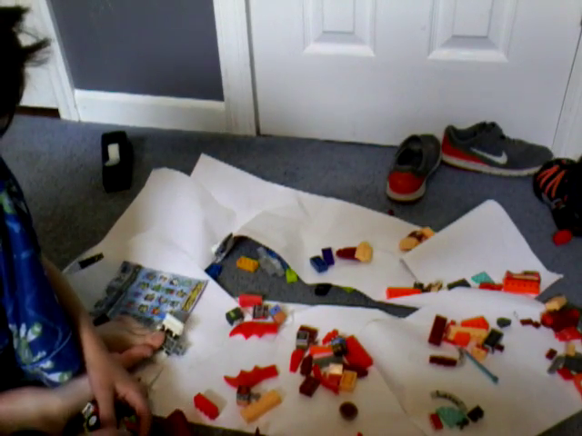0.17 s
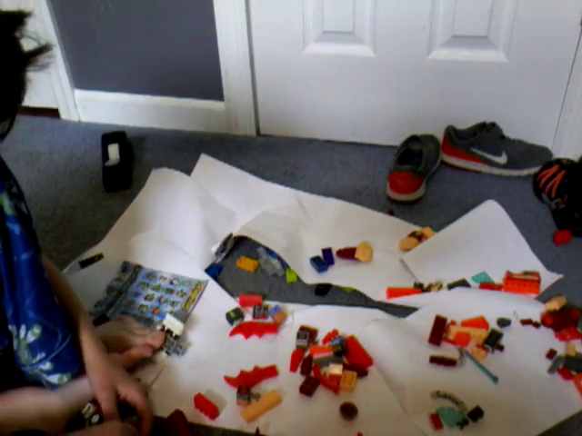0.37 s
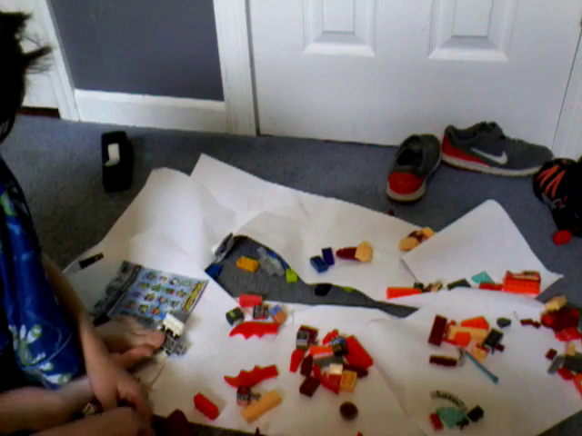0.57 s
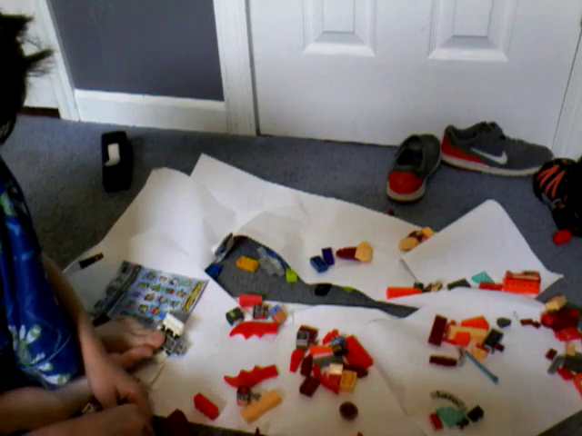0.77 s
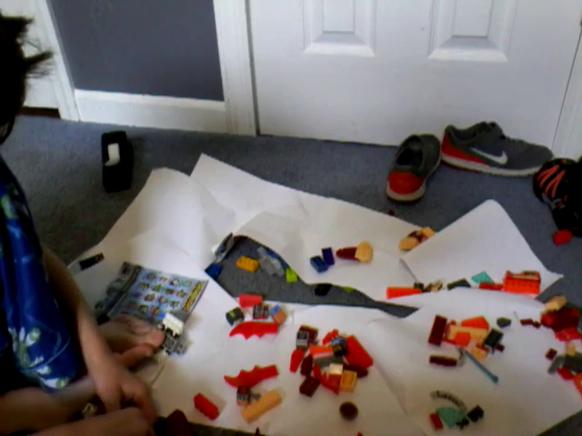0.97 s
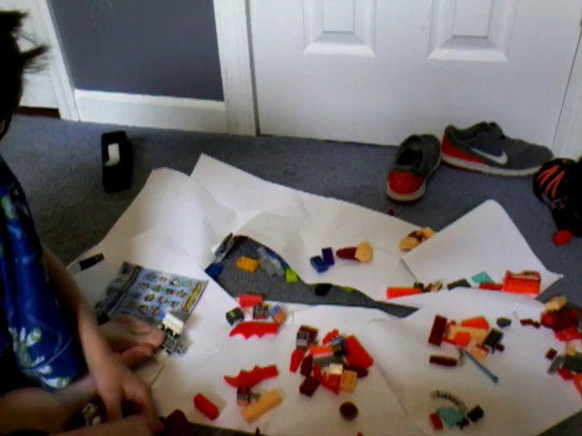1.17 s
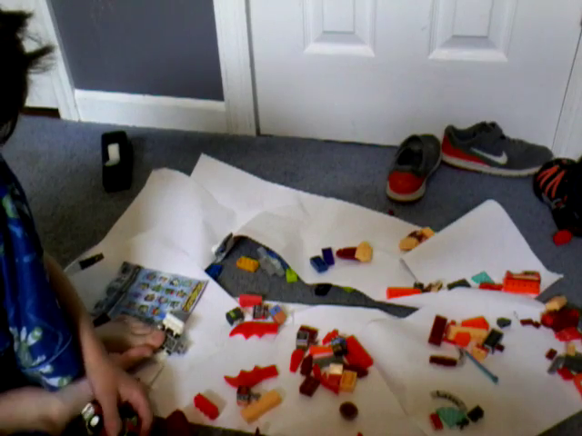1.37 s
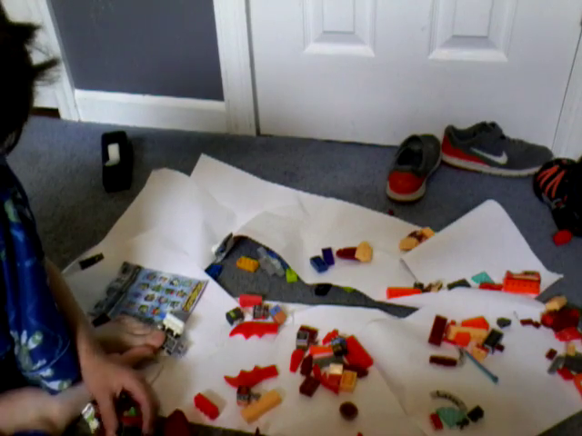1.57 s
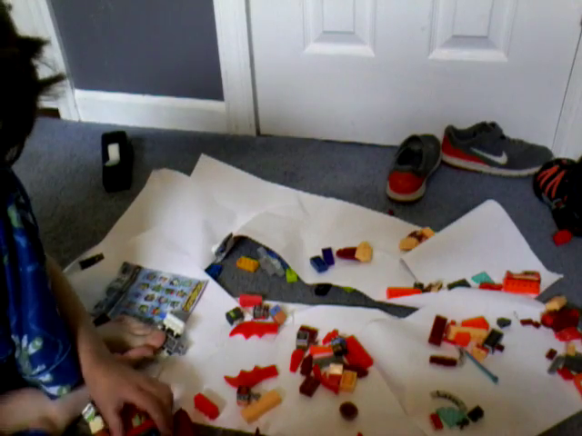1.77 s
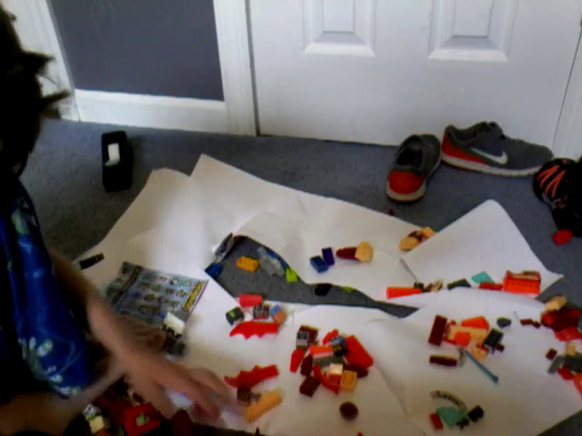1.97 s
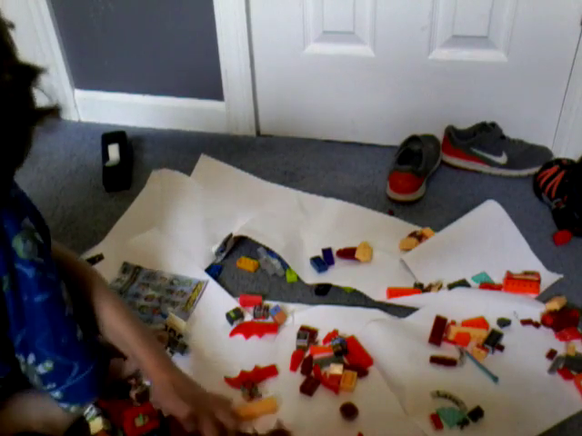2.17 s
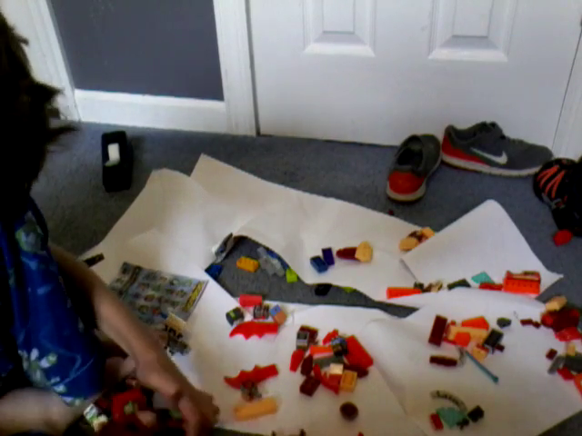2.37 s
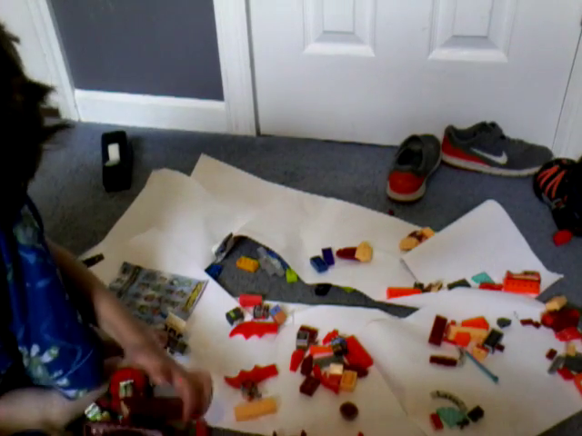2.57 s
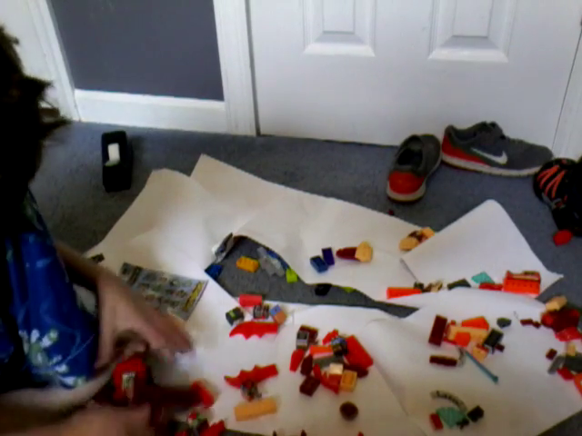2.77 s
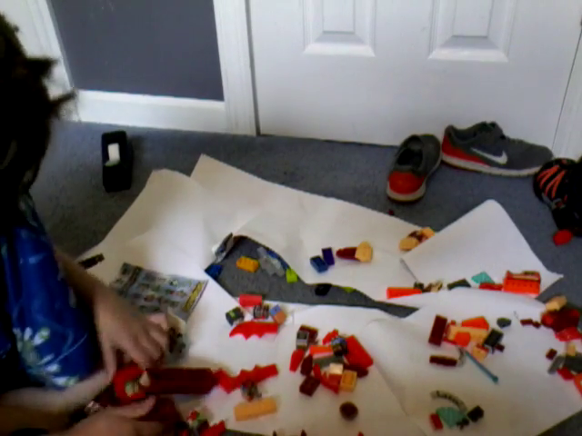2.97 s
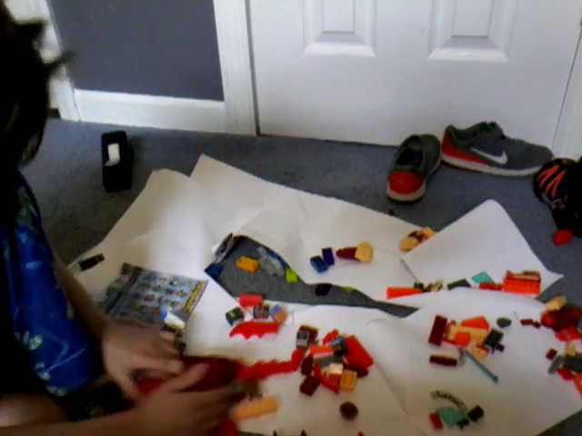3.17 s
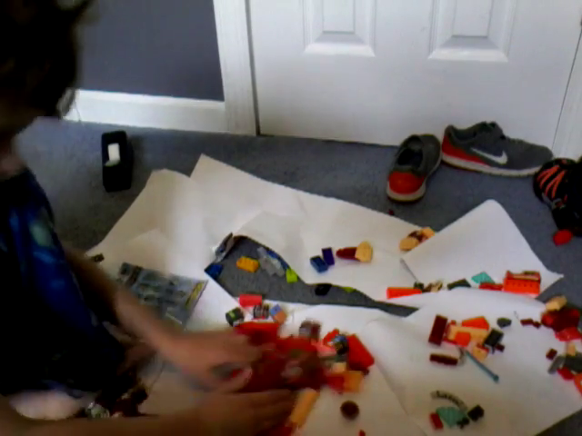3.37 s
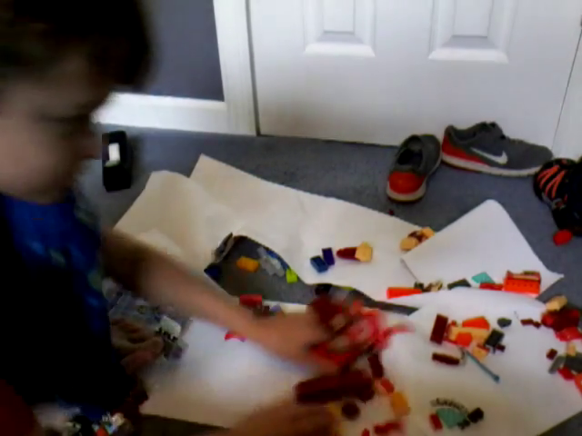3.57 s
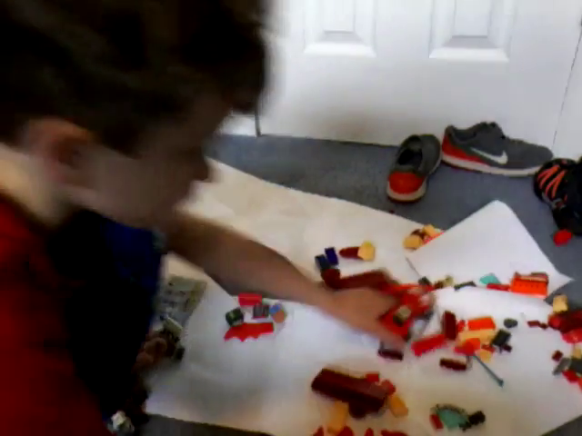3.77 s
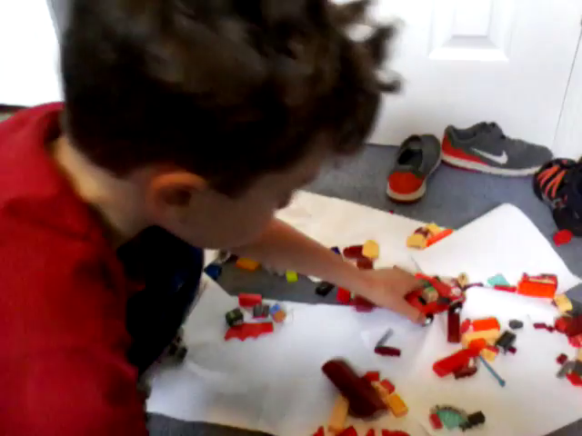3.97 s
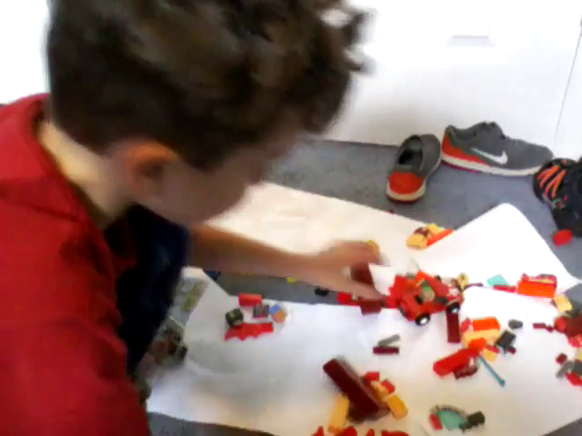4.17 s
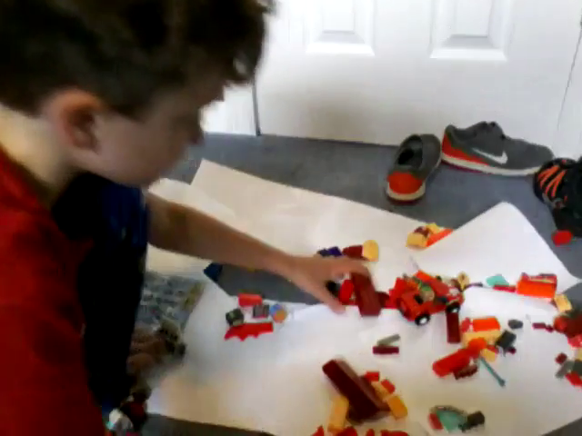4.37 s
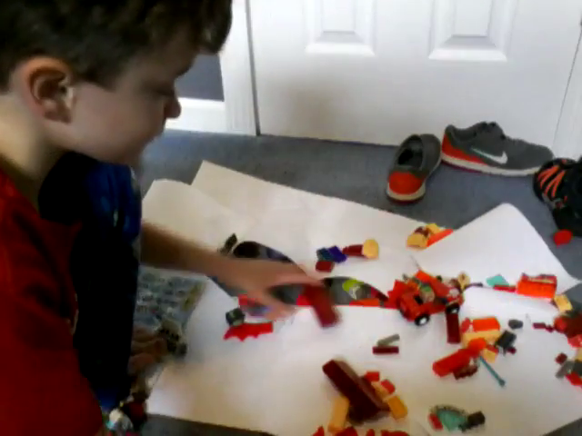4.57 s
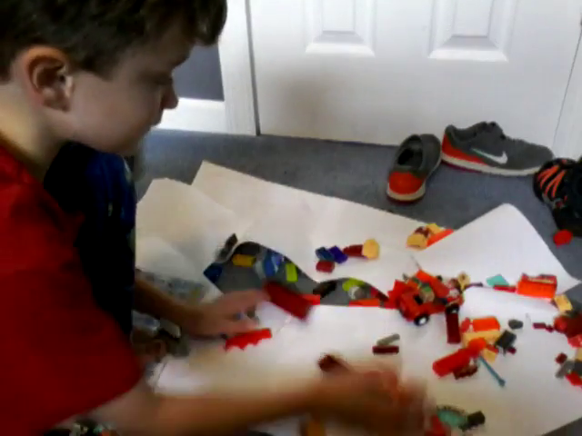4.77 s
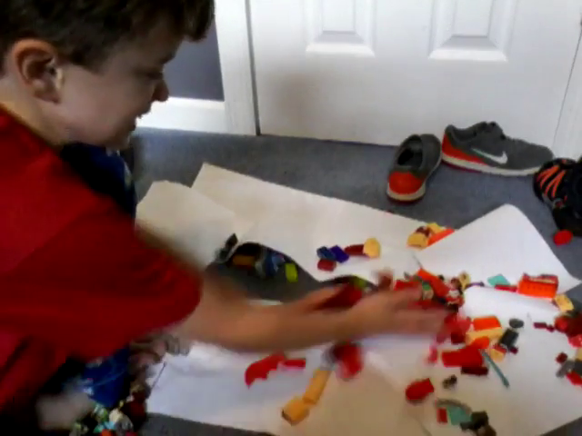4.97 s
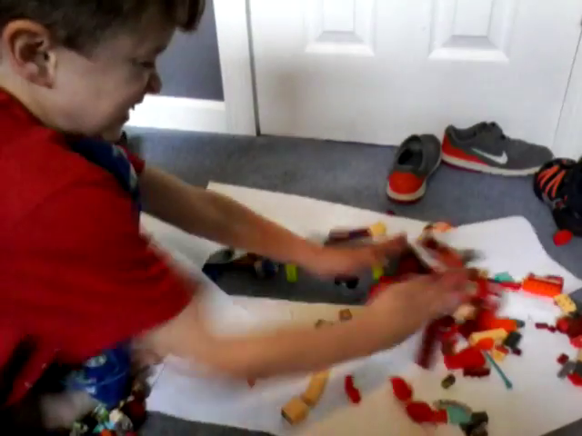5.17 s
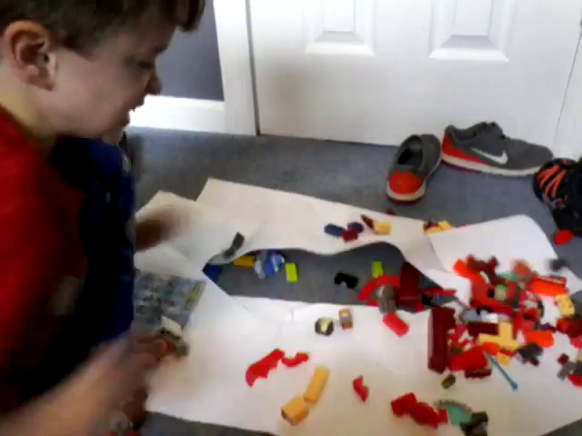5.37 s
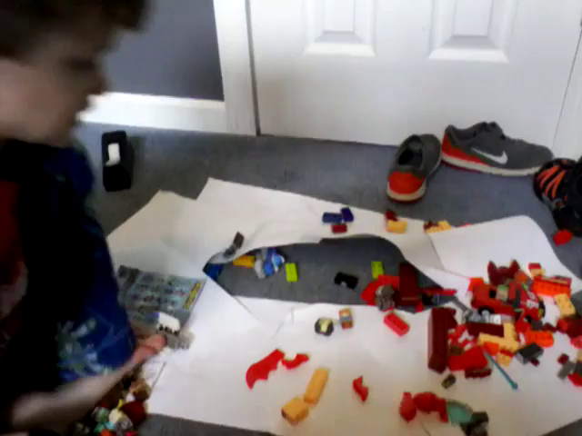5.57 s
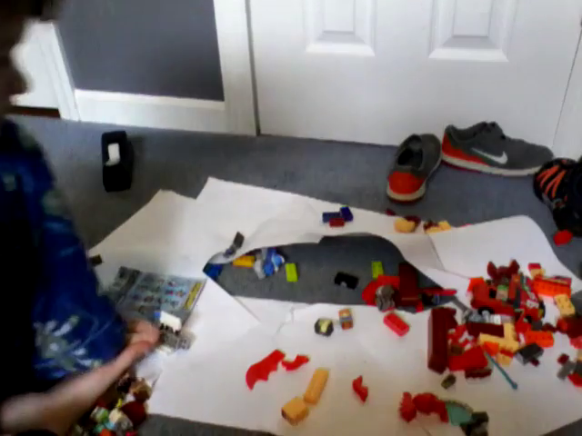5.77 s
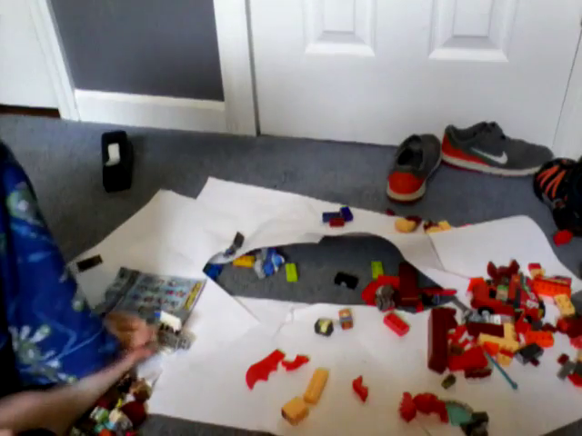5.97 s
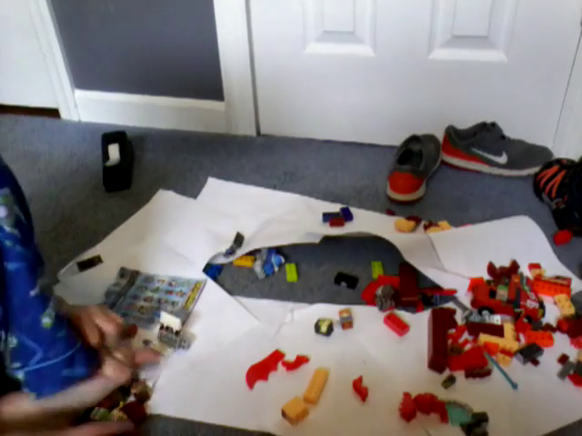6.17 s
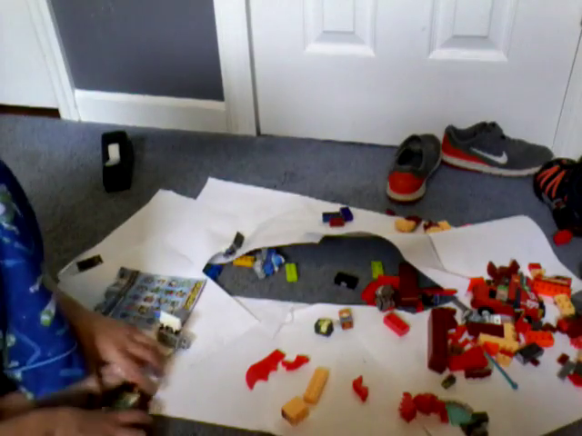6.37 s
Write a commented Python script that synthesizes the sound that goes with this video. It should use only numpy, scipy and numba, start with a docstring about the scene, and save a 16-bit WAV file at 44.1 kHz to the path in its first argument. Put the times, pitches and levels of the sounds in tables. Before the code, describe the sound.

After a quiet hum and one dry snap, a hand rakes small hollow plastic bricks over paper, a dense bright clatter that thins to faint ticks.

```python
"""Small hollow plastic bricks, raked by a hand on paper over a bedroom carpet, close to a small microphone.
Each clear knock is a noise crack plus short decaying brick modes, one ring of its own and a soft thud.
A swarm of lesser knocks fills the sweeps over rustling noise of paper. A hollow and a long piece ring too,
with single notes, dry snaps and ticks. A decaying noise tail is the room; a quiet house hums behind."""
import sys
import numpy as np
from scipy import signal
from scipy.fft import rfft, irfft
from scipy.io import wavfile
from scipy.ndimage import uniform_filter1d, minimum_filter1d
from numba import njit

SR = 44100
rng = np.random.default_rng(int(sys.argv[2]) if len(sys.argv) > 2 else 0)


def to_wav(s):
    """Save 16-bit WAV."""
    ch = np.atleast_2d(s).T  # columns
    pcm = np.round(np.clip(ch, -1, 1) * 32767)  # PCM
    wavfile.write(sys.argv[1], SR, pcm.astype(np.int16))


def invert_db(x):
    """Field ratio 10**(x/20) for x, a level in decibels (scalar or array-like)."""
    u = np.asarray(x, float) / 20
    return 10 ** u


N = 282681

# clear knocks; treble and thud relative to level: start_s, level_db, pitch_hz, t60_s, treble_db, thud_db
KNOCKS = [(1.5033, -35.5, 4440, 0.009, -14, -44), (1.5255, -32, 4530, 0.009, -33, -10),
          (1.6288, -22, 4370, 0.014, -35, -18), (1.6434, -42, 4430, 0.01, -31, -34),
          (1.6562, -32.5, 4440, 0.021, -27, -16), (1.6678, -20, 3440, 0.011, -35, -43),
          (1.6902, -8, 4260, 0.0098, -21, -51), (1.7034, -9.5, 4220, 0.018, -32, -57),
          (1.7104, -7, 4160, 0.012, -33, -57), (1.7163, -18, 4270, 0.013, -23, -53),
          (1.7519, -10, 4460, 0.012, -29, -52), (1.76, -9.5, 4280, 0.045, -19, -32),
          (1.7755, -3.5, 4270, 0.012, -36, -46), (1.7858, -4, 4460, 0.031, -31, -60),
          (1.8021, 1, 3880, 0.026, -34.5, -60), (1.8128, -14, 4120, 0.016, -28, -60),
          (1.8679, -34, 3770, 0.029, -28, -39), (1.9105, -25, 4270, 0.033, -26, -36),
          (1.9226, -26, 4400, 0.016, -22, -33), (2.0252, -22.5, 3780, 0.03, -21.5, -36),
          (2.0397, -27, 3620, 0.01, -26, -40), (2.0578, -2, 3820, 0.01, -33.5, -38.5),
          (2.066, -17, 3470, 0.011, -29.5, -45), (2.079, -21, 3880, 0.0071, -28.5, -45),
          (2.085, -5.5, 4430, 0.01, -33, -43), (2.0911, 5, 4290, 0.014, -33, -56),
          (2.0988, 5.5, 4330, 0.01, -30.5, -38), (2.1002, -9, 3300, 0.02, -14.5, -30),
          (2.1206, 2, 4440, 0.022, -20.5, -35.5), (2.1336, -2, 3650, 0.024, -21, -22),
          (2.157, -2.5, 4290, 0.048, -19.5, -47), (2.1754, -4, 4290, 0.013, -22, -53),
          (2.1832, 1, 4260, 0.023, -27, -50), (2.2016, -0.5, 4360, 0.009, -25, -52.5),
          (2.2094, -3, 3900, 0.034, -30, -43), (2.2364, 8, 4200, 0.014, -31.5, -42),
          (2.259, 13, 3854, 0.021, -29.5, -50), (2.2676, -0.5, 4100, 0.024, -27, -46),
          (2.309, 4, 4700, 0.01, -28.5, -53.5), (2.3343, -1.5, 3970, 0.054, -28.5, -52),
          (2.3556, 4.5, 3750, 0.026, -30, -57), (2.3648, 4, 2980, 0.019, -30.5, -58),
          (2.3803, 2.5, 3930, 0.026, -25.5, -59), (2.4059, 2, 3930, 0.01, -35, -60),
          (2.4117, 3, 4110, 0.031, -26, -60), (2.4336, -8.5, 4760, 0.04, -24.5, -52),
          (2.4517, -12, 4900, 0.043, -32, -55.5), (2.4673, -23, 4230, 0.018, -33, -56),
          (2.4924, -5.5, 3760, 0.029, -29, -22), (2.5077, -5.5, 4240, 0.011, -32, -38),
          (2.529, 7, 4510, 0.01, -26, -54), (2.5466, -2, 4490, 0.025, -29, -54),
          (2.5491, 12, 4200, 0.014, -17, -59), (2.5596, -8, 4160, 0.0071, -22.5, -60),
          (2.5897, -3.5, 4450, 0.012, -26, -49.5), (2.627, -2, 4650, 0.019, -28, -28),
          (2.6364, 1, 5140, 0.02, -35, -50), (2.6442, -5, 3940, 0.056, -34.5, -50),
          (2.674, -11.5, 5080, 0.028, -23.5, -51), (2.6897, 0, 3860, 0.026, -21, -59),
          (2.717, -18, 4600, 0.025, -24.5, -53), (2.745, -15, 4360, 0.017, -15, -45),
          (2.7934, -7, 3310, 0.028, -34, -42), (2.8002, -17, 4200, 0.031, -20, -46),
          (2.826, -13, 4310, 0.025, -19, -21), (2.8385, -15, 4230, 0.025, -27, -47),
          (2.878, -20, 4580, 0.025, -32, -42), (2.8917, -1, 4330, 0.011, -38, -53),
          (2.8963, -3, 3810, 0.028, -22, -52), (2.9174, -8, 4380, 0.024, -32, -45),
          (2.929, -6, 4650, 0.012, -25, -45), (2.9339, -10, 3620, 0.034, -20, -41),
          (2.945, -5, 3420, 0.03, -26, -51), (2.96, -12.5, 4400, 0.018, -21, -45),
          (2.9766, -19, 4460, 0.014, -24, -45), (3.0095, -6, 8130, 0.011, 4, -24),
          (3.0219, -9.5, 4080, 0.014, -20, -43), (3.024, -9, 3960, 0.035, -15, -39),
          (3.042, -4.5, 3220, 0.029, -29.5, -30), (3.053, -9, 4420, 0.018, -27, -46),
          (3.0869, -2, 3010, 0.015, -33, -24.5), (3.098, -13.5, 4190, 0.012, -26, -43),
          (3.1076, -14, 4600, 0.024, -29, -44), (3.118, -10, 2970, 0.024, -35, -47),
          (3.1266, -2.5, 4270, 0.018, -30, -52), (3.1313, -13, 4360, 0.029, -35, -47),
          (3.1496, -14.5, 2890, 0.024, -34, -51), (3.1625, -5, 4280, 0.018, -33, -49),
          (3.172, -9, 4870, 0.012, -28.5, -47), (3.1777, -9.5, 5000, 0.019, -21, -27.5),
          (3.1845, -2.5, 4220, 0.01, -26, -53), (3.1987, -9, 4600, 0.022, -30, -46),
          (3.2106, -6, 4980, 0.012, -26, -23.5), (3.2152, -5.5, 3320, 0.02, -21, -45),
          (3.2317, -12, 4500, 0.014, -25, -37), (3.24, -6.5, 5330, 0.018, -23, -40),
          (3.2669, -2, 3470, 0.017, -16, -14.5), (3.2862, -5.5, 4450, 0.025, -15, -45),
          (3.3002, -5.5, 4540, 0.034, -25, -42.5), (3.321, -11, 4430, 0.028, -31, -46),
          (3.3388, -3, 3960, 0.015, -39, -42), (3.3609, 5, 4440, 0.012, -40, -55.5),
          (3.3724, -6, 4570, 0.024, -37, -48), (3.399, -1.5, 4070, 0.033, -32.5, -50.5),
          (3.4163, -0.5, 4710, 0.038, -18.5, -52), (3.4495, 6, 6160, 0.023, -22.5, -53.5),
          (3.4726, 2, 6800, 0.025, -14.5, -23.5), (3.4863, -4, 4210, 0.037, -19, -42),
          (3.495, 6, 4330, 0.0095, -17.5, -48), (3.529, 7, 4400, 0.0095, -28, -50),
          (3.536, 4.5, 4490, 0.013, -24.5, -49), (3.543, -4, 4320, 0.027, -23, -46),
          (3.5639, 7.5, 4510, 0.014, -13, -46.5), (3.5695, -0.5, 4090, 0.032, -14, -43),
          (3.5854, -1.5, 3970, 0.049, -22.5, -24), (3.604, -1.5, 4350, 0.016, -16.5, -43),
          (3.6139, -3.5, 4380, 0.018, -22, -49), (3.627, -3.5, 4270, 0.013, -17, -45),
          (3.6378, 8, 4440, 0.04, -34, -54), (3.664, 0.5, 4300, 0.019, -17, -49),
          (3.68, 2.5, 4440, 0.019, -14, -45), (3.7038, 1.5, 4140, 0.024, -17, -35),
          (3.71, 1, 4020, 0.031, -16.5, -44), (3.7307, -3.5, 4170, 0.037, -19, -44),
          (3.7403, 3.5, 5550, 0.032, -28, -45), (3.7564, 0, 5620, 0.03, -20, -22.5),
          (3.79, 4.5, 4550, 0.008, -25, -30.5), (3.7996, -3, 4220, 0.015, -24, -23),
          (3.8167, 1, 4300, 0.0069, -25, -42), (3.8314, -2, 4460, 0.007, -39, -46),
          (3.8348, 0.5, 4440, 0.04, -30, -48), (3.8534, -6, 4270, 0.025, -26, -48),
          (3.8687, -4, 3880, 0.024, -29, -43), (3.8816, -1.5, 4410, 0.017, -6, -51),
          (3.903, -6.5, 5080, 0.036, -21, -41), (3.9253, -9, 4330, 0.039, -18, -41),
          (3.941, -4, 6520, 0.024, -18, -40), (3.9586, -4.5, 4480, 0.011, -14, -28),
          (3.967, -6, 4240, 0.028, -7, -34), (3.9736, -5, 4380, 0.025, -22, -48),
          (3.9992, -4.5, 4130, 0.029, -13, -22), (4.01, -3.5, 4530, 0.022, 2, -46),
          (4.0162, -5, 4340, 0.021, -19, -44), (4.0295, -8, 4240, 0.021, -29, -36),
          (4.0446, -13, 4180, 0.013, -29, -14), (4.0515, -9.5, 4500, 0.023, -24, -42),
          (4.0654, -11, 3250, 0.02, -25, -38), (4.103, -17, 4160, 0.015, -15, -37),
          (4.1216, -15, 4070, 0.034, -12, -37), (4.1358, -13, 3300, 0.023, -30, -34),
          (4.16, -6, 4170, 0.012, -40, -49), (4.167, -31, 3930, 0.026, -33, -39),
          (4.2179, -28, 4890, 0.025, -31, -35), (4.2442, -24, 4300, 0.04, -23, -37),
          (4.26, -16.5, 4340, 0.011, -4, -40), (4.264, -15, 4380, 0.014, -10, -47),
          (4.3, -26, 4370, 0.0097, -15, -38), (4.3063, -19, 4400, 0.012, -18, -44),
          (4.3319, -20, 3700, 0.022, -19, -21.5), (4.3433, -16.5, 6300, 0.025, -18, -39),
          (4.3834, -0.5, 4450, 0.015, -32, -22), (4.3978, 1.5, 4360, 0.017, -20.5, -23),
          (4.4057, -5, 4770, 0.0056, -28, -40), (4.4172, -15, 4270, 0.025, -26, -15.5),
          (4.4336, -29.5, 4490, 0.027, -33, -37), (4.445, -18, 4510, 0.015, -30, -39),
          (4.498, -13.5, 4440, 0.032, -36, -46), (4.509, -10, 3870, 0.037, -24, -49),
          (4.514, -2, 4460, 0.027, -35, -31), (4.5326, 6.5, 4395, 0.02, -19, -60),
          (4.5557, -12, 4290, 0.017, -14, -36), (4.5775, 7, 6870, 0.01, -2, -58),
          (4.5809, 1.5, 4120, 0.044, -13, -54), (4.6528, -5.5, 6330, 0.02, -22.5, -20.5),
          (4.6732, -0.5, 4490, 0.026, -27, -54), (4.6788, -4, 5040, 0.023, -27, -27.5),
          (4.684, -10, 4520, 0.024, -30.5, -42), (4.7263, -12, 4570, 0.029, -21, -47.5),
          (4.7501, -2, 4410, 0.028, -10, -58), (4.7665, -4.5, 4530, 0.023, -23, -60.5),
          (4.7792, 8, 4600, 0.011, 2, -62), (4.7965, -4.5, 4670, 0.0077, -16, -60),
          (4.8102, 3.5, 3970, 0.0078, -19.5, -49), (4.8156, 0, 4010, 0.035, -20, -22.5),
          (4.8504, -1.5, 4230, 0.012, -14, -32), (4.8593, 7, 5020, 0.029, -18, -33),
          (4.8814, 3, 3780, 0.023, -26.5, -45), (4.894, 1.5, 4284, 0.018, -27, -44),
          (4.9227, 0, 4340, 0.03, -36, -51.5), (4.9345, 4.5, 4295, 0.045, -32, -52),
          (4.9515, -2, 4230, 0.038, -30, -44), (4.9698, 2, 4460, 0.019, -33, -50),
          (4.9977, 3, 3930, 0.027, -23, -40), (5.0334, 0.5, 4110, 0.04, -14, -45),
          (5.0706, 5, 3784, 0.033, -26, -50), (5.0862, 3.5, 2903, 0.035, -22, -48),
          (5.0947, -1, 4200, 0.042, -22, -57), (5.143, -3, 4370, 0.019, -23, -22.5),
          (5.1767, 0, 4000, 0.037, -23, -45), (5.187, -5, 4300, 0.022, -25, -49),
          (5.198, -9, 3800, 0.024, -15, -48), (5.2053, 0, 3920, 0.026, -24, -22),
          (5.2337, -7, 3230, 0.04, -25, -25), (5.264, -14, 4100, 0.008, -31, -43),
          (5.272, -2, 3300, 0.03, -40, -51), (5.2776, -11, 4320, 0.047, -31, -43),
          (5.2928, -7, 3730, 0.049, -19.5, -45), (5.3203, -13, 4330, 0.014, -15, -40),
          (5.325, -5, 4120, 0.032, -13, -40), (5.336, 2.5, 3656, 0.027, -15, -45),
          (5.3429, 1.5, 3440, 0.011, -21, -44), (5.362, -5, 3880, 0.034, -20, -39),
          (5.3715, -11.5, 4650, 0.048, -18, -16), (5.3836, -3, 4500, 0.045, -20, -39),
          (5.398, -5, 4100, 0.036, -17, -39), (5.4061, -4.5, 4450, 0.013, -18, -15),
          (5.4197, -4, 4900, 0.031, -19, -39), (5.4328, -7, 4290, 0.024, -25, -39),
          (5.4517, -9, 4300, 0.025, -24, -34), (5.477, -10.5, 4500, 0.02, -7, -40),
          (5.4987, -14, 4980, 0.028, -27, -43), (5.5223, -19, 4580, 0.017, -13, -37),
          (5.5334, -29, 4400, 0.015, -24, -17), (5.5683, -19, 4060, 0.026, -28, -38),
          (5.587, -24, 4100, 0.009, -31, -40), (5.6165, -26, 4340, 0.021, -30, -41),
          (5.6327, -23, 3730, 0.028, -28, -41), (5.6414, -24, 3700, 0.028, -28, -36),
          (5.6647, -22, 3770, 0.04, -19, -34), (5.6805, -28, 4670, 0.029, -23, -32),
          (5.7132, -24, 5500, 0.02, -16, -33), (5.7344, -30, 4460, 0.024, -20, -31),
          (5.745, -34, 3960, 0.012, -21, -35), (5.7607, -31, 4240, 0.014, -29, -37),
          (5.7766, -29, 3960, 0.029, -25, -39), (5.8016, -30, 4100, 0.022, -18, -34),
          (5.809, -33, 4430, 0.042, -22, -14), (5.8197, -24.5, 4150, 0.0091, -22, -26),
          (5.8472, -33, 4560, 0.016, -24, -35), (6.158, -38, 4400, 0.015, -18, -31),
          (6.2078, -39, 4450, 0.022, -25, -33), (6.2183, -23.5, 5650, 0.014, -15, -34),
          (6.2286, -48, 5900, 0.025, -20, -34), (6.2399, -47, 5700, 0.018, -22, -31),
          (6.278, -30, 2900, 0.01, -28, -34), (6.2987, -33, 3590, 0.009, -17, -28.5),
          (6.315, -23.5, 4080, 0.011, -20, -38), (6.325, -24.5, 4570, 0.008, -28, -38),
          (6.3416, -27, 4560, 0.033, -14, -35), (6.3528, -28, 5290, 0.015, -17, -42),
          (6.365, -28, 5470, 0.04, -17, -34), (6.379, -24, 4530, 0.008, -30, -40),
          (6.3855, -28, 4340, 0.021, -21, -34), (6.4059, -23.5, 4430, 0.0063, -31, -47)]
# range of thud pitch: low_hz, high_hz
THUD_RANGE_HZ = (554, 660)


def knocks(contacts=2):
    """Clear knocks: a contact with a quick rebound, the piece's own ring, a thud on paper and carpet."""
    start_s, level_db, pitch_hz, t60_s, treble_db, thud_db = np.transpose(KNOCKS)
    thud_hz = np.interp(rng.random(len(start_s)), (0, 1), THUD_RANGE_HZ)
    size = invert_db(level_db)
    start = (start_s * SR).astype(int)

    order = np.arange(contacts)
    late_s = 0.003 * np.cumsum(rng.random((len(start_s), contacts)), axis=1) * (order > 0)
    contact_s = (start_s[:, None] + late_s).ravel()
    contact_size = (size[:, None] * invert_db(-7 * order)).ravel()
    # a piece that rings long was touched more softly and cracks less
    hardness = np.repeat(np.minimum(1, 0.016 / t60_s) ** 0.36, contacts)
    contact_treble_db = np.repeat(treble_db, contacts) + 18.5
    body = bricks(contact_s, contact_size * hardness, contact_treble_db,
                  scatter_db=4.5, detune=0.0368, crack_db=8.5)

    # the ring builds up while the pieces touch, then dies
    slow = ring(start, pitch_hz, t60_s, size, N, 1. * SR)
    fast = ring(start, pitch_hz, t60_s * 0.44, size, N, 1. * SR)
    own = 0.91 * slow - 0.96 * fast

    thud = ring(start, thud_hz, np.full(len(start_s), 0.022), size * invert_db(thud_db - 4), N, 1. * SR)
    thud = thud + colour(bursts(start, size * invert_db(thud_db - 5.5), 0.0088), PAPER)
    no_bass = signal.butter(2, 350, "highpass", fs=SR, output="sos")
    return invert_db(-20) * body + signal.sosfilt(no_bass, invert_db(-3) * own + invert_db(-2) * thud)


# modes of a brick, t60 before the damping cap: mode_hz, level_db, t60_s
BRICK_MODES = [(2400, -12, 0.027), (2824, -5.5, 0.037), (3167, -8, 0.059), (3900, -44, 0.0174),
               (4440, -35, 0.039), (5080, -7, 0.06), (5605, -2.5, 0.056), (6456, 0.5, 0.053),
               (6900, 0, 0.06), (8100, -1, 0.054), (9990, -5, 0.03)]
# relative spectrum of a crack: freq_hz, level_db_per_hz
CRACK_COLOUR = [(530, -53.5), (900, -47), (1740, -24.5), (2600, 4), (2820, 7), (3480, 15), (4310, 17.5),
                (5320, 11.5), (8330, -13.5), (13800, -29), (15000, -54)]
# mode lift by the pieces under the hand: time_s, lift_2700hz_db, lift_5300hz_db, lift_6700hz_db
PIECES = [(1.6, 8.5, -4, -3), (1.8, -4.5, -13, -3), (2.1, 3.5, -7, -3), (2.3, -0.5, -12, 0.5),
          (2.55, -5, 3.5, -2), (2.8, 1.5, -13, 4.5), (3.1, 4, -12, -5), (3.4, -3.5, 4.5, 0.5),
          (3.6, -4, 5.5, 0.5), (3.8, 1, -3.5, 0.5), (4.05, 4, 8.5, -0.5), (4.4, 6, 3.5, -5),
          (4.7, -3.5, -2, 0), (4.9, -6.5, -4, -3), (5.1, 1.5, 2, 1.5), (5.3, 1.5, -3, 0),
          (5.55, 5.5, 7, 0.5), (5.9, 5, 4, -1.5)]
# borders of the lifted mode bands: edge_hz
PIECE_EDGES_HZ = (3500, 4700, 6000, 7500)


def bricks(start_s, size, treble_db, scatter_db, detune, crack_db):
    """Every contact cracks and rings the brick modes, each with its own share, tuning and damping."""
    mode_hz, mode_db, t60_s = np.transpose(BRICK_MODES)
    luck = rng.standard_normal((len(start_s), 3, len(mode_hz)))
    start = np.minimum(start_s * SR, N - 1).astype(int)

    time_s, low_db, mid_db, high_db = np.transpose(PIECES)
    flat_db = 0 * time_s
    bands_db = (low_db, flat_db, mid_db, high_db, flat_db)
    lifts_db = np.transpose([np.interp(start_s, time_s, band_db) for band_db in bands_db])
    lift_db = lifts_db[:, np.searchsorted(PIECE_EDGES_HZ, mode_hz)]
    # harder contacts lift the upper modes
    tilt_db = np.minimum(treble_db, 4)[:, None] * np.clip((mode_hz - 6000) / 3000, 0, 1)
    gain = size[:, None] * invert_db(mode_db + scatter_db * luck[:, 0] + tilt_db + lift_db)
    cap_s = np.minimum(0.024, 90 / mode_hz)
    damped_s = np.minimum(t60_s, cap_s) * np.exp(0.25 * luck[:, 2])
    # pieces differ most in their upper modes
    tuned_hz = mode_hz * (1 + detune * mode_hz / 4000 * luck[:, 1])
    modes = ring(np.repeat(start, len(mode_hz)), tuned_hz.ravel(), damped_s.ravel(), gain.ravel(),
                 N, 1. * SR)

    crack = colour(bursts(start, size * 1.17, 0.00098), CRACK_COLOUR)
    top = signal.butter(2, (7500, 13500), "bandpass", fs=SR, output="sos")
    tick = signal.sosfilt(top, bursts(start, size * invert_db(treble_db), 0.0015))
    # small pieces radiate no bass and little extreme treble
    small = signal.butter(3, (1300, 10000), "bandpass", fs=SR, output="sos")
    return signal.sosfilt(small, modes) + invert_db(crack_db) * crack + invert_db(-16.5) * tick


# the hand, all levels relative, treble against rattle: time_s, rattle_db, treble_db, paper_db
SWEEP = [(0, -66, -16, -67.5), (1.2, -70.5, -1, -69.5), (1.6, -57, -23, -68.5), (1.74, -38, 5, -58),
         (1.77, -15, -27, -57), (1.805, -19.5, -15, -66), (1.83, -45, -10, -59), (1.87, -38, -13, -60),
         (1.99, -65, -30, -66), (2.101, -18.5, 0.5, -39), (2.25, -11, -25.5, -47.5),
         (2.55, -15.5, -23.5, -52.5), (2.76, -27, -31, -51.5), (2.9, -21, -46, -42.5),
         (3.0, -36, -46.5, -49), (3.16, -22, -24.5, -46.5), (3.34, -21, -16, -42.5), (3.44, -16, -4, -40),
         (3.57, -15, -3, -37), (3.72, -12.5, -18.5, -34.5), (3.782, -18.5, -14, -37),
         (3.82, -14.5, -24, -38), (3.89, -14, -2, -37.5), (4.08, -31.5, -31, -43.5), (4.22, -43, -11, -50),
         (4.47, -25.5, -31, -52), (4.6, -26, -12.5, -46.5), (4.72, -19.5, -21, -52), (4.86, -11, -14, -38),
         (5.2, -14, -24.5, -42.5), (5.364, -14.5, -21.5, -33), (5.56, -31.5, -24, -45),
         (5.94, -60.5, -8, -70), (6.2, -52, -1, -65.5), (6.41, -40.5, -22, -53.5)]
# relative spectrum of paper: freq_hz, level_db_per_hz
PAPER = [(120, -28), (250, 2), (500, -1), (1000, 1.5), (1800, 2), (3000, -22)]


def sweep(count=4500):
    """A swarm of small knocks, few loud and many faint, and paper crinkling, both following the hand."""
    time_s, rattle_db, treble_db, paper_db = np.transpose(SWEEP)
    luck = rng.random((count, 2))
    start_s = luck[:, 0] * N / SR
    scatter_db = -2.6 * np.log(1 - 0.995 * luck[:, 1])
    size = invert_db(scatter_db + np.interp(start_s, time_s, rattle_db) - 21)
    rattle = bricks(start_s, size, np.interp(start_s, time_s, treble_db) + 23,
                    scatter_db=5, detune=0.032, crack_db=9)
    level_db = np.interp(np.arange(N) / SR, time_s, paper_db) + 1.47 * walk(60)
    return rattle + colour(rng.standard_normal(N) * invert_db(level_db), PAPER)


def piece(table, pitch_hz, spread, t60_s, swarm_db, count=400, contacts=3):
    """The one ring of a large piece: clear knocks with rebounds, and lesser ones that follow the hand."""
    clear_s, clear_db = np.transpose(table)
    order = np.arange(contacts)
    late_s = 0.014 * np.cumsum(rng.random((len(clear_s), contacts)), axis=1) * (order > 0)
    contact_db = clear_db[:, None] - 4.3 * order

    luck = rng.random((count, 2))
    hand_s, rattle_db = np.transpose(SWEEP)[:2]
    lesser_s = luck[:, 0] * N / SR
    lesser_db = np.interp(lesser_s, hand_s, rattle_db) + 12 * luck[:, 1] + swarm_db

    start_s = np.append(clear_s[:, None] + late_s, lesser_s)
    size = invert_db(np.append(contact_db, lesser_db))
    tuned_hz = pitch_hz * (1 + spread * (rng.random(len(start_s)) - 0.5))
    rings = ring((start_s * SR).astype(int), tuned_hz, np.full(len(start_s), t60_s), size, N, 1. * SR)
    return signal.lfilter(*signal.butter(2, (pitch_hz / 1.08, pitch_hz * 1.28), "bandpass", fs=SR), rings)


# clear knocks on a long piece: start_s, level_db
LONG = [(1.6265, -43), (1.69, -23), (1.751, -30), (1.7862, -15.5), (2.0573, -36), (2.0897, -18.5),
        (2.1965, -30.5), (2.2368, -7), (2.3666, -19), (2.5073, -13), (2.55, -9), (2.6326, -10),
        (2.8944, -24), (3.0885, -13), (3.3379, -33), (3.4347, -32), (3.626, -14), (3.6743, -6.5),
        (3.83, -20), (3.8806, -22), (4.382, -20.5), (4.5826, -8.5), (4.815, -8.5), (4.865, -14),
        (4.9712, -10), (5.0333, -8), (5.0886, -11), (5.17, -12), (5.3234, -14), (5.4246, -18.5)]


def long_piece():
    """A long piece rings near 2.9 kHz."""
    return invert_db(-2) * piece(LONG, 2865, spread=0.03, t60_s=0.034, swarm_db=-17)


# clear knocks on a large hollow piece in the pile: start_s, level_db
HOLLOW = [(1.7604, -19), (1.7883, -28), (2.0852, -17.5), (2.1241, -21), (2.1834, -24), (2.3351, -17),
          (2.4084, -19.5), (2.43, -35), (2.4503, -29), (2.495, -26), (2.5167, -22), (2.59, -24),
          (2.64, -23), (1.775, -21), (1.803, -31), (2.5646, -24), (2.6199, -23), (2.6733, -24.5),
          (2.8265, -28.5), (2.72, -34), (2.77, -35), (2.8903, -29.5), (2.94, -30), (3.4905, -24),
          (3.9055, -29), (4.0168, -21), (4.8894, -26), (5.0305, -20), (5.2624, -25.5), (5.4194, -32)]


def hollow_piece():
    """A large hollow piece rings near 1.8 kHz."""
    return piece(HOLLOW, 1780, spread=0.04, t60_s=0.036, swarm_db=-28.5)


# one piece, tapped or dragged: start_s, level_db, pitch_hz, t60_s
NOTES = [(1.442, -53, 3800, .02), (1.452, -52, 3670, .02), (1.463, -47, 3880, .025), (1.47, -48, 3660, .02),
         (1.481, -53, 3750, .025), (1.32, -58, 4330, 0.051), (1.365, -61, 4500, 0.054),
         (1.5218, -26.5, 610, 0.012), (1.849, -40, 3900, 0.025), (1.768, -14, 4260, 0.016),
         (1.793, -9, 5060, 0.014), (1.795, -18.5, 5980, .03), (1.703, -24, 7000, .03),
         (2.11, -16, 2270, .04), (2.124, -17.5, 1620, 0.045), (2.14, -16, 2280, .03),
         (2.199, -19, 1880, 0.028), (2.26, -19, 1650, .03), (2.244, -9, 4000, .025),
         (2.251, -5, 3750, .025), (2.252, -14, 7000, .04), (2.255, -15, 8600, .03), (2.411, -9, 3320, .05),
         (2.53, -19, 2340, .06), (2.528, -9, 3260, .05), (2.571, -14, 3190, .04), (2.72, -23, 3260, 0.032),
         (2.81, -18, 3270, .05), (4.536, -13, 6980, 0.032), (4.537, -9, 4450, 0.019),
         (4.61, -26, 6400, 0.039), (5.48, -25, 2920, .03), (5.73, -46, 8170, 0.054),
         (5.79, -38, 6180, 0.019), (6.22, -38, 3350, 0.023), (6.345, -39, 8040, .04),
         (3.01, -6.5, 8100, 0.025), (3.21, -27, 600, 0.048), (3.279, -17.5, 4520, 0.058),
         (5.5, -13.5, 5030, 0.038), (5.51, -28, 5600, 0.042), (5.633, -35, 3750, 0.064),
         (5.633, -32, 2790, 0.067), (5.631, -39, 6200, 0.053), (5.665, -35, 3770, 0.047),
         (5.717, -41, 6000, 0.11), (5.822, -37, 6640, 0.042), (5.846, -45, 4550, 0.035),
         (6.217, -30, 5870, 0.02), (6.345, -37, 6700, .04), (6.39, -38, 6700, .04),
         (4.056, -16.5, 6560, .025), (3.93, -15.5, 8500, 0.049), (4.225, -35, 6400, 0.12),
         (3.519, -6, 7500, 0.025)]


def notes():
    """Single modes that swell for a moment and die: a slow decay less a quick one of equal size."""
    start_s, level_db, pitch_hz, t60_s = np.transpose(NOTES)
    start = (start_s * SR).astype(int)
    slow = ring(start, pitch_hz, t60_s, invert_db(level_db), N, 1. * SR)
    fast = ring(start, pitch_hz, t60_s * 0.15, invert_db(level_db), N, 1. * SR)
    return slow - fast


# dry snaps: start_s, level_db
SNAPS = [(1.0663, -9.5), (1.068, -18), (1.0708, -27), (1.073, -28), (1.078, -29), (4.12, -30), (6.274, -41)]
# relative spectrum of a snap: freq_hz, level_db_per_hz
SNAP_COLOUR = [(300, -33), (600, -14), (1100, -23), (2000, -10.5), (3300, -6), (4200, -1.5), (4800, 6),
               (5500, -3.5), (6200, -13), (7300, -4), (9000, -17), (14500, -13)]
# faint dry ticks with the colour of a crack: start_s, level_db
TICKS = [(0.5431, -36), (0.5468, -35), (0.5485, -44), (1.5224, -33)]


def snaps_and_ticks():
    """Coloured noise bursts, all crack and no ring."""
    out = np.zeros(N)
    for table, points in ((SNAPS, SNAP_COLOUR), (TICKS, CRACK_COLOUR)):
        start_s, level_db = np.transpose(table)
        out += colour(bursts((start_s * SR).astype(int), invert_db(level_db), decay_s=0.0007), points)
    return out


def room(x):
    """Early answer and short tail of a small furnished room: decaying noise convolved with the sound."""
    t60_s, level_db = 0.22, -7
    t = np.arange(int(0.5 * SR)) / SR
    tail = rng.standard_normal(len(t)) * invert_db(-60 * t / t60_s) * np.clip((t - 0.002) / 0.0058, 0, 1)
    tail = signal.lfilter([1], [1, -0.3], tail)
    return invert_db(level_db) * signal.fftconvolve(x, tail / np.sqrt(np.sum(tail ** 2)))[:N]


def port(x):
    """Resonance of the microphone port: one peak filter."""
    peak_hz, width_hz, level_db = 4450, 590, -8
    return invert_db(level_db) * signal.lfilter(*signal.iirpeak(peak_hz, peak_hz / width_hz, SR), x)


# relative spectrum of rumble and hiss: freq_hz, level_db_per_hz
HOUSE_COLOUR = [(15, -31.5), (25, -22), (48, -34), (72, -7.5), (107, -2.5), (233, -6), (266, -12.5),
                (304, -1.5), (388, -7.5), (456, -12), (700, -21.5), (916, -41), (1700, -81), (2110, -29.5),
                (6340, -30), (13800, -31.5), (15400, -23)]
# bands of rumble: centre_hz, width_hz, level_db, start_s
HUMS = [(300, 71, -67.5, 0), (119, 130, -57.5, 0.9)]
# steady hums of the house, wandering about pitch and level: pitch_hz, level_db, start_s
TONES = [(143, -59, 0.94), (290, -61.5, 0.02)]


def house():
    """Rumble and microphone hiss as coloured noise, bands of low rumbling noise, one broad, and wavering sines."""
    out = colour(rng.standard_normal(N), HOUSE_COLOUR) * invert_db(-55 + 0.14 * walk(0.84))
    t = np.arange(N) / SR
    for centre_hz, width_hz, level_db, start_s in HUMS:
        rumble = signal.lfilter(*signal.iirpeak(centre_hz, centre_hz / width_hz, SR), rng.standard_normal(N))
        out += rumble / rumble.std() * invert_db(level_db) * np.clip((t - start_s) / 0.051, 0, 1)
    for pitch_hz, level_db, start_s in TONES:
        phase = 2 * np.pi * np.cumsum(pitch_hz * (1 + 0.012 * walk(6))) / SR
        fade = np.clip((t - start_s) / 0.05, 0, 1)
        out += np.sin(phase) * invert_db(level_db + 1.5 * walk(8)) * fade
    return out


def colour(x, points):
    """Causal minimum-phase filter through (Hz, dB) points, keeping the power of white noise."""
    hz, db = np.transpose(points)
    f = np.maximum(np.arange(2049) * SR / 4096, 1)
    log_gain = np.interp(np.log(f), np.log(hz), db) * np.log(10) / 20
    # fold the cepstrum onto positive time
    cepstrum = irfft(log_gain)
    cepstrum[1:2048] *= 2
    cepstrum[2049:] = 0
    h = irfft(np.exp(rfft(cepstrum)))[:2048]
    return signal.fftconvolve(x, h / np.sqrt(np.sum(h ** 2)))[:N]


@njit
def ring(start, hz, t60, size, n, sr):
    """Each row is one mode struck once, dying 60 dB in t60 seconds."""
    y = np.zeros(n)
    for k in range(len(start)):
        turn = np.exp(2j * np.pi * hz[k] / sr - np.log(1000) / (t60[k] * sr))
        z = size[k] + 0j
        for i in range(start[k], min(n, start[k] + int(t60[k] * sr))):
            y[i] += z.imag
            z *= turn
    return y


def bursts(start, size, decay_s):
    """Noise that jumps up at each start and dies away by a factor e in decay_s."""
    kick = np.bincount(start, size, N)[:N]
    return signal.lfilter([1], [1, -np.exp(-1 / (decay_s * SR))], kick) * rng.standard_normal(N)


def walk(rate_hz):
    """Random levels held 1 / rate_hz and slewed; spread near 1."""
    hold = int(SR / rate_hz)
    steps = np.repeat(rng.standard_normal(N // hold + 1), hold)
    return 1.754 * uniform_filter1d(steps, hold)[:N]


def scene():
    """Bricks and paper in the room, lifted by the resonance of the microphone port, over the house."""
    near = knocks() + sweep() + long_piece() + hollow_piece() + notes() + snaps_and_ticks()
    near = near + room(near)
    return (near + port(near) + house())[None]


def roll_off(x):
    """The treble ends steeply here."""
    return signal.sosfilt(signal.butter(12, 15660, fs=SR, output="sos"), x)


def record(dry):
    """The top is cut above 14.6 kHz, then a quick look-ahead limiter holds the peaks."""
    x = signal.sosfilt(signal.ellip(8, 0.2, 70, 14600, fs=SR, output="sos"), dry)
    ceiling = 0.95
    # 3 ms minimum, smoothed twice over 1.5 ms
    gain = minimum_filter1d(ceiling / np.maximum(np.abs(x), ceiling), size=133)
    gain = uniform_filter1d(uniform_filter1d(gain, size=66), size=66)
    return roll_off(x * gain)


dry = scene()
out = record(dry)
to_wav(out)
```